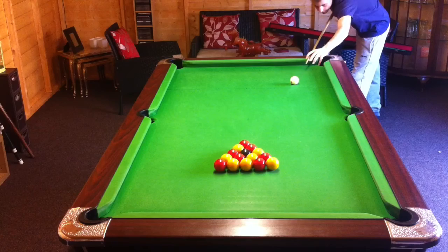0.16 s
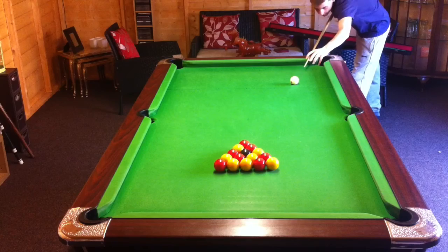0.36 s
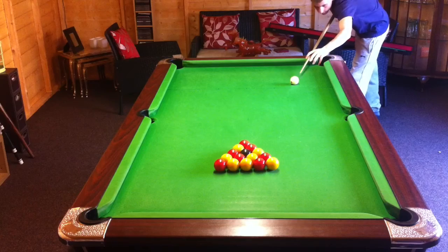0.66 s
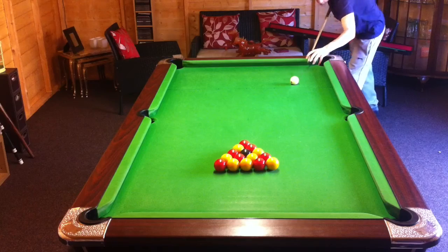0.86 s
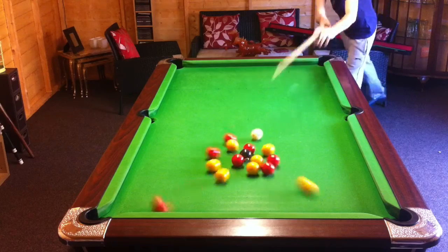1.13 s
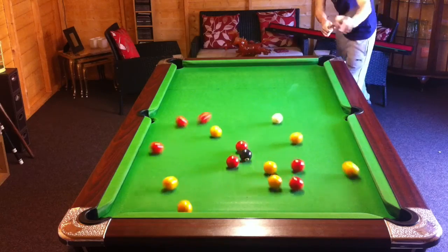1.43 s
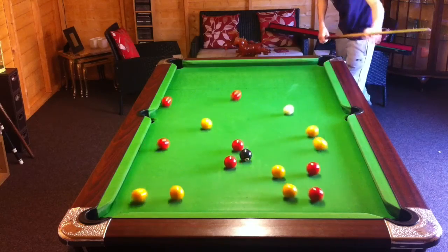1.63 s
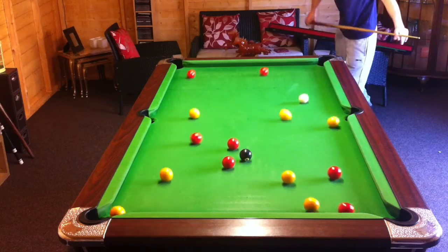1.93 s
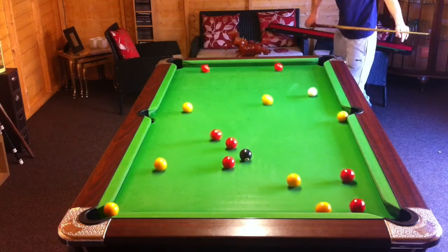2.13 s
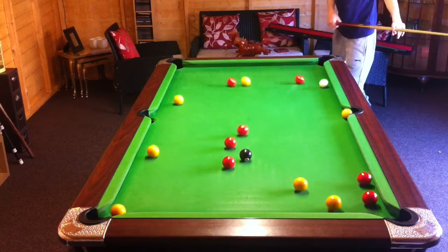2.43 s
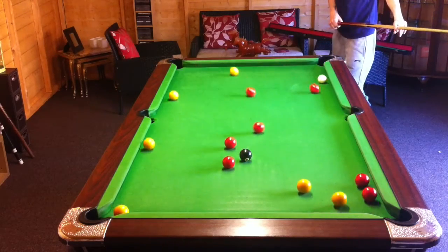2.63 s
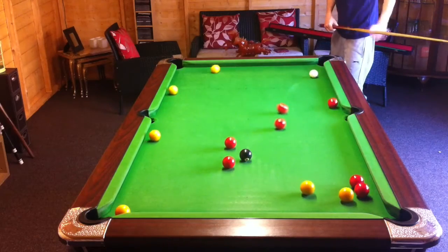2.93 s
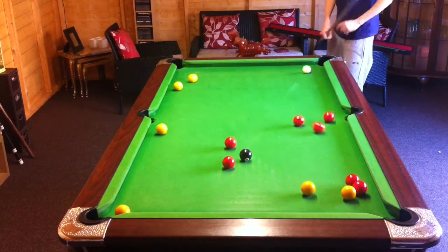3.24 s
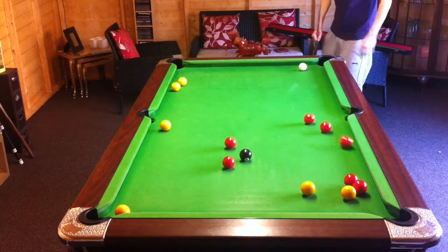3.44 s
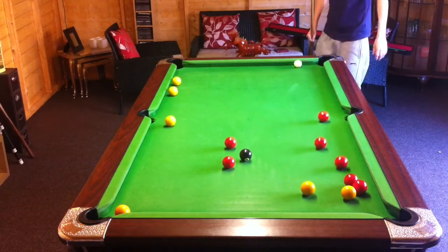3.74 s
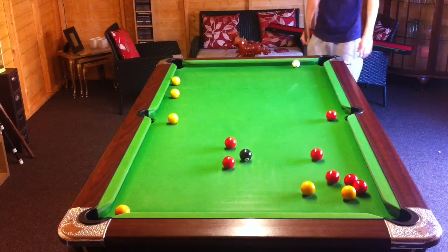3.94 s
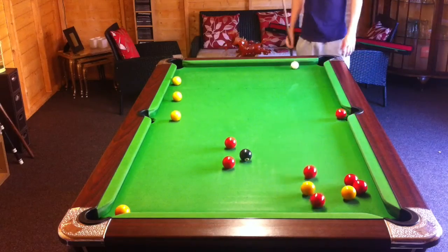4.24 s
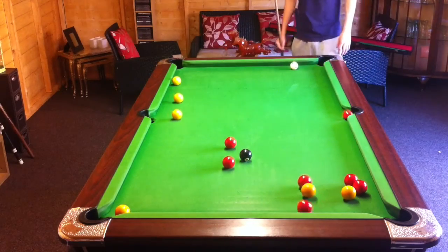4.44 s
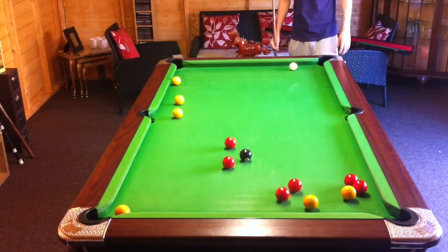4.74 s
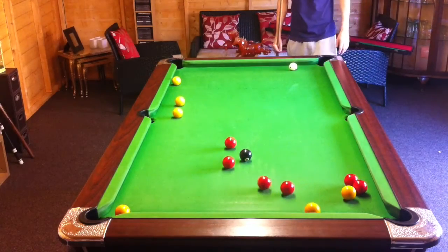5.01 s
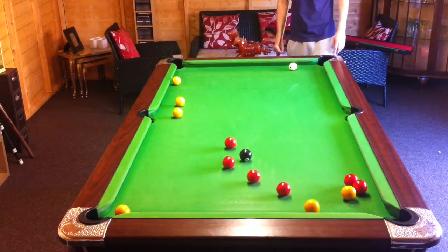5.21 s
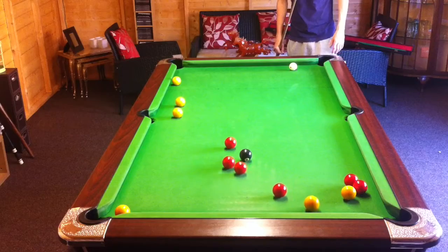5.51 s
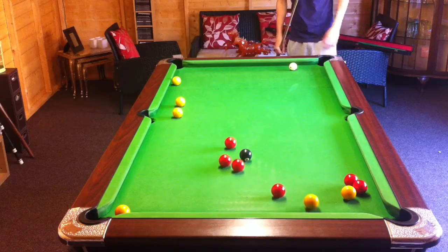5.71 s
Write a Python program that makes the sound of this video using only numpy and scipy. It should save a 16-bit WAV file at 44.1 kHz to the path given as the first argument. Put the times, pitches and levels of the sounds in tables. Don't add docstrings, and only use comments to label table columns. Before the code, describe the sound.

Low room tone, then a leather tip pop and an explosive burst of hard ball clacks. Rubber cushions thump faintly, a ball brushes into a pocket, and one clear clack rings out. Later, clusters of hollow wooden knocks, rolling and cabinet booms come from under the table. Close indoor space with a brief reverberation, heard through a small, slightly squashed microphone.

```python
import sys
import numpy as np
from scipy import signal
from scipy.fft import rfft, irfft
from scipy.io import wavfile
from scipy.ndimage import uniform_filter1d, minimum_filter1d

SR = 44100
rng = np.random.default_rng(int(sys.argv[2]) if len(sys.argv) > 2 else 0)


def generate_wav(signal):
    frames = np.transpose(np.atleast_2d(signal))
    scaled = np.clip(frames, -1, 1) * 32767
    pcm = np.round(scaled).astype(np.int16)
    wavfile.write(sys.argv[1], SR, pcm)


def ratio(d):
    e = np.asarray(d, float) / 20
    return 10 ** e


N = 258867

# frequency in Hz, level in dB, t60 in seconds.
CHANNEL_MODES = [(395, -8, 0.045), (401, -13, 0.19), (477, -3, 0.059), (554, -2, 0.11), (634, 1.5, 0.063),
                 (726, 7.5, 0.034), (766, 1, 0.085), (813, -5.5, 0.067), (836, -1.5, 0.068),
                 (920.3, 3.5, 0.066), (1037, -1, 0.074), (1161, -11.5, 0.13), (1264, -4.5, 0.11),
                 (1356.5, 0, 0.043), (1496, 6, 0.027)]
# frequency in Hz, level in dB, t60 in seconds.
PANEL_MODES = [(140, -14.5, 0.073), (157, -7, 0.058), (184, 10.5, 0.055), (206.3, 2, 0.11),
               (213, -10, 0.017), (273, 3.5, 0.058), (313.7, -4.5, 0.15)]
LANDING_SCATTER_DB = 2.5
RUBBER_S = .003
PULSE_LEAD_S = 256 / SR


def evened(x):
    return x / np.sqrt(np.mean(x ** 2) + 1e-20)


def peaked(x):
    return x / (abs(x).max() + 1e-20)


def read(points, hz):
    f, value = np.transpose(points)
    return np.interp(np.log(hz + 1), np.log(f + 1), value)


def add(mix, s, sound):
    part = mix[round(s * SR):][:len(sound)]
    part += sound[:len(part)]


def coloured(x, spectrum):
    gain = ratio(read(spectrum, np.fft.rfftfreq(len(x), 1 / SR)))
    return irfft(rfft(x) * gain, len(x))


def pulse(db, hz, cycles):
    turns = (np.arange(512) - 256) / SR * hz
    window = np.cos(np.pi / 2 * np.clip(turns / (0.91 * cycles), -1, 1)).clip(0) ** 1.9
    return -ratio(db) * np.cos(2 * np.pi * turns) * window


def lone_pulses(rows):
    out = np.zeros(N)
    for s, db, hz, cycles in rows:
        add(out, s - PULSE_LEAD_S, pulse(db, hz, cycles))
    return out


def ball_contacts(rows, cycles):
    out = np.zeros(N)
    for s, db, hz, delay_s, echo_db in rows:
        clack = pulse(db, hz, cycles)
        snap = pulse(db - 24, 11500, 1.2)
        add(out, s - PULSE_LEAD_S, clack + snap)
        add(out, s + delay_s - PULSE_LEAD_S, ratio(echo_db) * (clack + 0.43 * snap))
    return out


def ring(modes, scatter_db, damp, contact_s, centre_hz=700, focus_db=0, detune=0.0088, size=8192):
    hz, db, t60 = np.transpose(modes)[:, :, None]
    level_luck, pitch_luck, phase = rng.standard_normal((len(modes), 3)).T[:, :, None]
    t = np.arange(size) / SR
    db = db + scatter_db * level_luck - focus_db * abs(np.log2(hz / centre_hz))
    swing = np.sin(2 * np.pi * (hz * (1 + detune * pitch_luck) * t + phase))
    body = (ratio(db - 60 * t / (damp * t60)) * swing).sum(0)
    return body * np.sin(np.pi / 2 * np.minimum(t / contact_s, 1)) ** 2


def chatter(length_s, count):
    when, sign = rng.random((count, 2)).T
    when = (when - when.min()) * 3
    strength = (2 * sign - 1) * (0.82 + when) * np.exp(-1.3 * when)
    taps = np.zeros(8192)
    np.add.at(taps, np.minimum(when * length_s * SR, 8191).astype(int), strength)
    return taps


def rack_break():
    # start in seconds, peak in dB, pulse in Hz, ceiling echo delay in seconds, echo in dB.
    hits = [
        (1.1364, -2, 1400, .0069, -7),
        (1.1368, -8, 5000, .0069, -12),
        (1.1376, -3, 2800, .0062, 1),
        (1.1397, -9, 3400, .0052, -2),
        (1.1410, -11, 2000, .0072, -3),
        (1.1386, -7, 2300, .006, 1),
        (1.156, -13, 3100, .002, 0),
        (1.160, -15, 2400, .0022, -2),
        (1.169, -17, 2700, .004, -2),
        (1.204, -30, 4000, .007, -6),
    ]
    return ball_contacts(hits, 1.4)


def cue_tip():
    # start in seconds, peak in dB, pulse in Hz, length in cycles.
    strokes = [
        (1.0504, -2, 900, 1.5),
    ]
    return lone_pulses(strokes)


def cue_shaft():
    # frequency in Hz, density in dB per Hz.
    rattle_spectrum = [(710, -38.5), (1200, -11), (1610, -13), (1770, 3.5), (1980, -19), (2730, -14),
                       (2920, -11), (3050, -11), (6160, -13.5), (11200, -34.5), (16000, -60.5)]
    out, t = np.zeros(N), np.arange(4096) / SR
    noise = coloured(rng.standard_normal(len(t)), rattle_spectrum)
    rattle = noise * (t / .006) ** 2 * np.exp(-t / 0.0056)
    add(out, 1.051, ratio(-15.5) * peaked(rattle))
    return out


def ball_clacks():
    # start in seconds, peak in dB, pulse in Hz, ceiling echo delay in seconds, echo in dB.
    hits = [(1.4885, -25, 2800, .0059, 6), (1.4895, -24, 2000, .0075, 6), (1.4925, -33, 2400, .0135, 8),
            (3.133, -39, 1500, .007, -8), (3.168, -41, 1500, .004, -6), (3.177, -32, 1650, .012, -9),
            (3.4512, -15, 2300, .0078, -4), (5.660, -31, 2000, .0085, 5), (2.648, -30, 1900, .008, 2),
            (2.157, -50, 1600, .007, -3), (5.249, -12, 2000, .007, -8)]
    return ball_contacts(hits, 1.1)


def table_thumps():
    # start in seconds, peak in dB, # frame pitch in
    # Hz, hardness in dB.
    thumps = [(1.017, -43, 203, 1), (1.045, -33.5, 252, 15), (1.134, -28, 200, 2.5), (1.209, -28, 148, -1),
              (1.231, -29.5, 161, -14), (1.319, -39.5, 162, -4), (1.348, -43, 126, -4.5),
              (1.44, -49.5, 142, -30.5), (1.512, -43, 170, -10), (1.545, -52, 155, 0),
              (1.61, -45, 137, -19), (2.004, -46, 188, -23), (2.155, -33, 173, -3.5),
              (2.207, -53, 208.4, 1), (2.446, -32, 244, -4.5), (2.476, -43, 246, -17),
              (2.887, -39, 158.6, -13), (2.928, -45, 133, -3), (3.577, -47, 140, -2),
              (3.734, -52, 196, -13), (3.832, -47.5, 272, -24)]
    out = np.zeros(N)
    for s, db, hz, hard_db in thumps:
        frame = [(hz, 0, .08), (1.285 * hz, -5, .06), (0.75 * hz, -6, .08),
                 (3.1 * hz, -9, .05), (2.1 * hz, -12, .05)]
        thump = ring(frame, 4.9, 0.75, 0.002)
        rail = ring(CHANNEL_MODES + PANEL_MODES, LANDING_SCATTER_DB, 0.33, RUBBER_S, 480, 7.2, detune=0.04)
        contacts = chatter(.014, count=5)
        thump = peaked(signal.fftconvolve(contacts, thump))
        knock = peaked(signal.fftconvolve(contacts, rail))
        add(out, s, ratio(db) * (thump + ratio(hard_db) * knock))
    return out


def shaken(contacts, t, t60):
    decay = ratio(-60 * t / t60)
    return signal.fftconvolve(abs(contacts), decay)[:len(t)] + 2.1 * decay * np.minimum(t / 0.0022, 1)


def drops():
    # start in seconds, peak in dB, pulse in Hz, length in cycles.
    blows = [
        (5.2423, -4, 760, 2.6),
        (5.3925, -11, 760, 2.4),
        (4.4765, -6, 770, 3.0),
        (5.324, -15, 820, 5.0),
    ]
    # start in seconds, channel level in dB,
    # channel centre in Hz, hardness in dB, tumble length in seconds.
    landings = [(2.647, -16.5, 754, -22.5, .05), (3.196, -32, 760, -23, 0.069),
                (3.318, -23, 920, -25, 0.031), (3.37, -28, 910, -47, .05), (4.013, -9.5, 710, -39, 0.057),
                (4.086, -12, 628, -43, 0.051), (4.15, -26, 640, -54, 0.051), (4.385, -8, 596, -42, .02),
                (4.43, -19.5, 628, -41, 0.021), (4.472, -3.5, 810, -40, .035),
                (4.54, -17.5, 800, -58, .025), (4.614, -9.5, 770, -25, 0.041),
                (4.719, -34, 757, -13.5, 0.033), (4.915, -16, 676, -58, 0.043),
                (5.039, -25.5, 790, -23, 0.059), (5.126, -35, 900, -5.5, .03),
                (5.208, -24.5, 584, -13.5, 0.016), (5.24, -6, 700, -21, .035), (5.3, -44, 770, -33, .03),
                (5.391, -9.5, 770, -26.5, 0.03), (5.468, -33.5, 846, -31, 0.036),
                (5.688, -9.5, 690, -41.5, 0.044), (5.755, -11.5, 700, -45.5, 0.046),
                (5.809, -24, 632, -47, .05)]
    # frequency in Hz, density in dB per Hz.
    knock_spectrum = [(700, -35.5), (1400, -3.5), (1900, 0), (2400, -8.5), (3100, -13), (4200, -26),
                      (6000, -28.5), (9000, -50)]
    # frequency in Hz, density in dB per Hz.
    tick_spectrum = [(2000, -51), (3500, 4), (6000, 2), (8000, -6.5), (11000, -12), (14000, -23),
                     (16000, -15)]
    tumble_fall_db, grit_fall_db = -10.5, -5.5
    out, t = lone_pulses(blows), np.arange(6000) / SR
    for s, db, hz, hard_db, tumble_s in landings:
        for along in np.linspace(0, 1, 3):
            contacts = chatter(.009, count=20)[:2000]
            grit = rng.standard_normal((2, len(t)))
            centre_hz = hz * np.exp(0.15 * rng.standard_normal())
            channel = ring(CHANNEL_MODES, LANDING_SCATTER_DB, 0.42, 0.0041, centre_hz, 8.0,
                           detune=0.027, size=6000)
            box = signal.fftconvolve(contacts, channel)
            knock = coloured(grit[0] * shaken(contacts, t, .12), knock_spectrum)
            tick = coloured(grit[1] * shaken(contacts, t, .07), tick_spectrum)
            box_db = -2.5 * (along == 0)
            tick_db = hard_db + grit_fall_db * along
            knock_db = -6.5 + 0.36 * hard_db + grit_fall_db * along
            for rel_db, layer in [(box_db, box), (knock_db, knock), (tick_db, tick)]:
                level_db = db + rel_db + tumble_fall_db * along ** 2
                add(out, s + along * tumble_s, ratio(level_db) * peaked(layer))
    return out


def thuds():
    # start in seconds, peak in dB, lean to the small panels in dB per octave.
    booms = [(2.653, -26, 3), (2.679, -36.5, 19), (3.2, -41, 1), (3.249, -39.5, 12), (3.324, -35.5, 15),
             (3.363, -36.5, 18.5), (4.013, -24.5, 4), (4.034, -23.5, -6), (4.087, -16.5, -15),
             (4.125, -24, -3.5), (4.18, -27.5, -12), (4.384, -28.5, 5), (4.438, -35, 3),
             (4.472, -11.5, 1.5), (4.611, -19, 9), (4.649, -17.5, -4), (4.917, -22.5, -1.5),
             (5.041, -30.5, 0), (5.124, -33.5, 7), (5.193, -30, 1.5), (5.211, -22, -3), (5.253, -29, 1.5),
             (5.376, -26.5, 8.5), (5.682, -20, 1.5), (5.723, -21.5, 6), (5.771, -20.5, -11),
             (5.84, -32, -5.5)]
    out = np.zeros(N)
    for s, db, lean_db in booms:
        contacts = chatter(.009, count=20)[:2000]
        panels = ring(PANEL_MODES, LANDING_SCATTER_DB, 0.81, 0.0052, 330, lean_db, size=6000)
        add(out, s, ratio(db) * peaked(signal.fftconvolve(contacts, panels)))
    return out


def rolling():
    # start in seconds, length in seconds, first level in dB, last level in dB.
    rolls = [
        (3.6, 0.41, -67, -43),
        (4.201, 0.18, -35, -39),
        (4.953, 0.25, -49, -26.5),
    ]
    out = np.zeros(N)
    for s, length_s, first_db, last_db in rolls:
        along = np.arange(0, length_s, 1 / SR) / length_s
        height, chance = rng.standard_normal((2, SR))
        bumps = height * (chance > 2)
        wood = ring(CHANNEL_MODES + PANEL_MODES, LANDING_SCATTER_DB, 0.43, RUBBER_S, 600, 2.7)
        hum = evened(signal.fftconvolve(bumps, wood)[:len(along)])
        level_db = first_db + (last_db - first_db) * along - 9.5
        add(out, s, ratio(level_db) * hum * signal.windows.tukey(len(along), .2))
    return out


def scuffs():
    # start in seconds, peak in dB, centre in Hz, rise in seconds, t60 in seconds.
    rubs = [
        (.996, -55, 5000, .02, .5),
        (.99, -50, 1200, .02, .6),
        (2.618, -57, 3000, .008, .06),
        (2.648, -40, 11000, .008, .14),
        (5.125, -44, 12000, .004, .09),
        (2.649, -26, 1600, .012, .25),
        (4.916, -30, 1150, .008, .2),
        (5.6, -60, 5500, .03, .2),
    ]
    out, t = np.zeros(N), np.arange(8192) / SR
    for s, db, hz, rise_s, t60 in rubs:
        band = [(hz / 4, -24.0), (hz / 1.4, -1.5), (hz * 1.2, -1.5), (hz * 1.8, -16.0), (hz * 6, -40.0)]
        hiss = coloured(rng.standard_normal(len(t)), band)
        swell = np.minimum(t / rise_s, 1) ** 2 * ratio(-60 * np.maximum(t - rise_s, 0) / t60)
        add(out, s, ratio(db) * peaked(hiss * swell))
    return out


def room(x, gap_s):
    # frequency in Hz, t60 in seconds.
    decay_times = [(120, 0.37), (330, 0.33), (870, 0.36), (2300, 0.32), (6000, 0.25), (14000, 0.2)]
    # frequency in Hz, level in dB.
    wall_colour = [(200, 3), (1200, -0.5), (2500, -4.5), (4000, -4.5), (5500, -2.5), (8000, -3.5),
                   (15000, -8.5)]
    out, size = np.zeros(N), 30000
    count = size // 20 - 1
    turn = np.pi * 1.7 * np.arange(N) / SR
    for k in range(3):
        taps = np.zeros(size)
        places = np.arange(0, size - 20, 20) + rng.integers(0, 20, count)
        taps[places] = rng.choice([-1., 1.], count)
        hz, t, z = signal.stft(taps, SR, nperseg=256)
        fading = z * ratio(-60 * t / read(decay_times, hz)[:, None])
        tail = signal.istft(fading, SR, nperseg=256)[1][:size]
        tail *= np.clip(np.arange(size) / SR / gap_s, 0, 1) ** 2
        tail = coloured(tail / np.linalg.norm(tail), wall_colour)
        share = np.cos(turn + k * np.pi / 3) ** 2
        out += signal.fftconvolve(x * share, tail)[:N]
    return out


def air():
    # frequency in Hz, density in dB per Hz.
    tone_spectrum = [(15, -53.5), (25, -22), (33, -42), (64, -31), (114, 2.5), (149, -9), (217, -2),
                     (335, -8), (439, -10), (503, -6.5), (624, -9.5), (1020, -13), (2220, -27.5),
                     (14800, -32.5), (16000, -28)]
    # frequency in Hz, rms level in dB.
    whines = [
        (14998, -87.5),
    ]
    # start in seconds, length in seconds, frequency in Hz, level in dB.
    coos = [
        (.6, 0.093, 503, -58.5),
        (2.3, 0.14, 1195, -68),
    ]
    frames, hz, t = N // 256 + 5, np.fft.rfftfreq(1024, 1 / SR), np.arange(N) / SR
    a, b, patches = rng.standard_normal((frames, 513, 3)).T
    patches = evened(uniform_filter1d(uniform_filter1d(patches, 8, 0), 12, 1))
    cells = (a + 1j * b) * ratio(read(tone_spectrum, hz)[:, None] + 0.4 * patches)
    hiss = signal.istft(cells, nperseg=1024, noverlap=768)[1][:N]
    out = ratio(-60.5) * evened(hiss)
    for f, db in whines:
        out += ratio(db + 4.5) * np.sin(2 * np.pi * f * t)
    for s, length_s, f, db in coos:
        part = t[:round(length_s * SR)]
        add(out, s, ratio(db) * np.sin(2 * np.pi * f * part) * signal.windows.tukey(len(part), .5))
    duck_s, duck_db, recover_s = 1, -12, 0.96
    return out * ratio(duck_db * (t > duck_s) * np.exp(-abs(t - duck_s) / recover_s))


def scene():
    rack, tip = rack_break(), cue_tip()
    bright = ball_clacks() + cue_shaft()
    wood = table_thumps() + drops() + thuds() + rolling()
    wood = signal.sosfilt(signal.butter(7, 128, "high", fs=SR, output="sos"), wood)
    to_room = ratio(-7) * tip + ratio(-3) * rack + ratio(1) * bright + ratio(-4.5) * wood
    walls = room(to_room, 0.0047)
    return (tip + rack + bright + ratio(0.5) * wood + walls + scuffs() + air())[None]


def band_limit(x):
    return signal.sosfilt(signal.butter(12, 16650, fs=SR, output="sos"), x)


def record(dry):
    limit = .71
    cut = signal.sosfilt(signal.butter(2, 40, "high", fs=SR, output="sos"), dry)
    cut = signal.oaconvolve(cut, signal.firwin(255, 15900, fs=SR)[None], "same")
    room_left = minimum_filter1d(limit / np.maximum(abs(cut), limit), size=161)
    limited = cut * uniform_filter1d(room_left, size=81)
    return band_limit(limited)


dry = scene()
out = record(dry)
generate_wav(out)
```